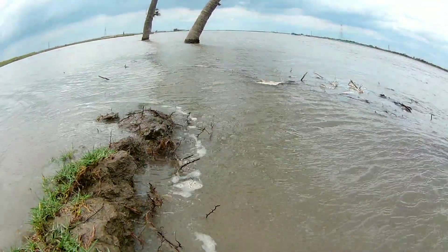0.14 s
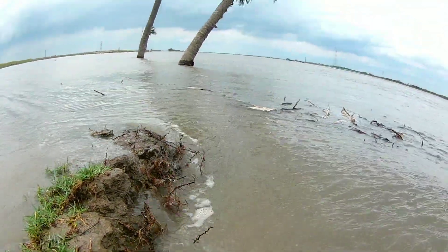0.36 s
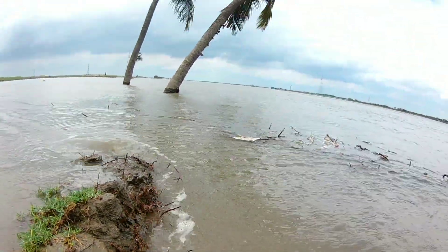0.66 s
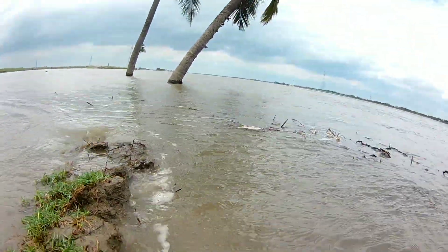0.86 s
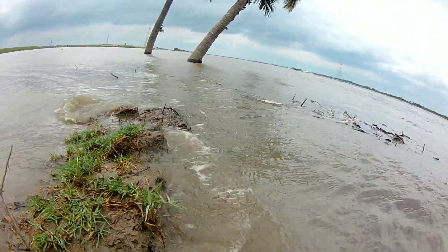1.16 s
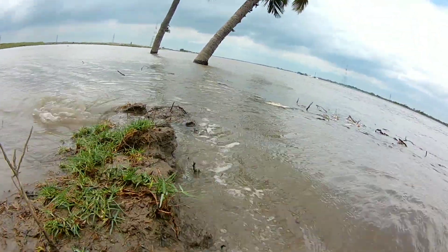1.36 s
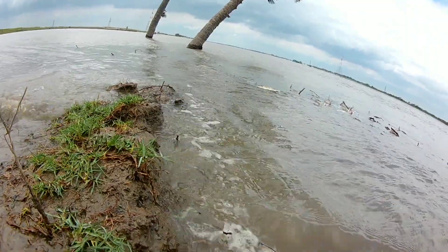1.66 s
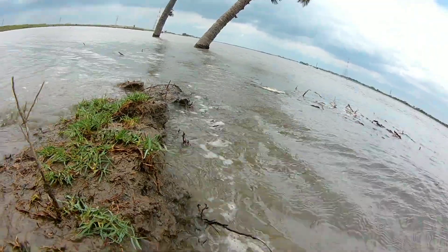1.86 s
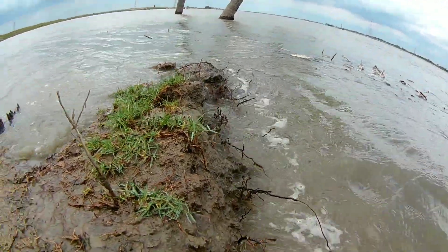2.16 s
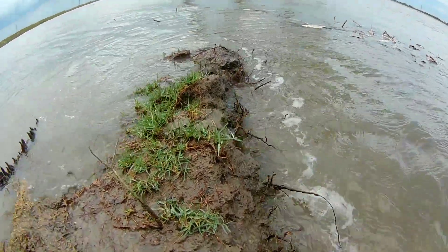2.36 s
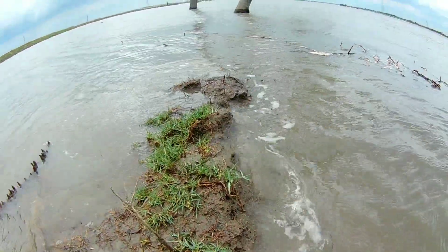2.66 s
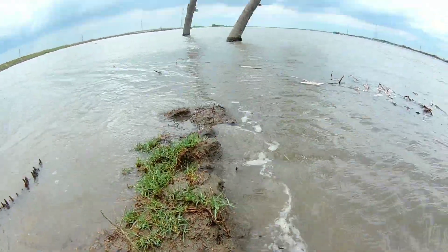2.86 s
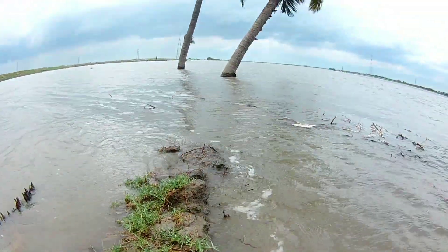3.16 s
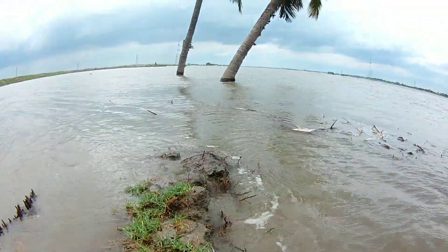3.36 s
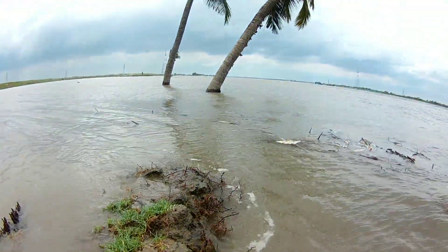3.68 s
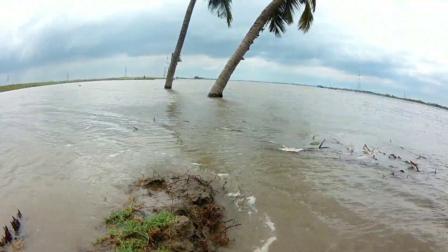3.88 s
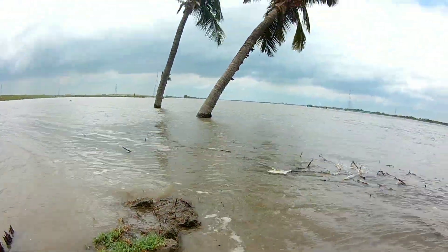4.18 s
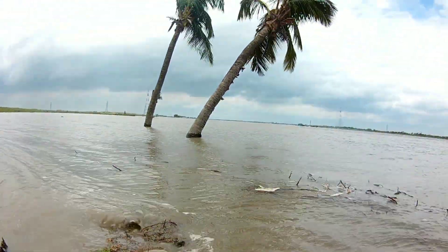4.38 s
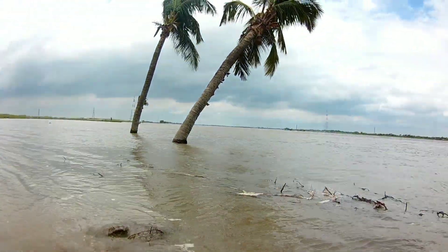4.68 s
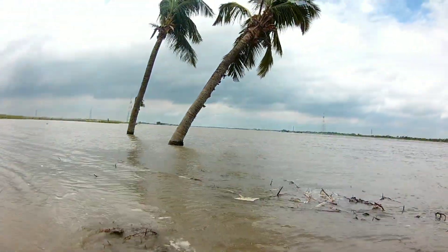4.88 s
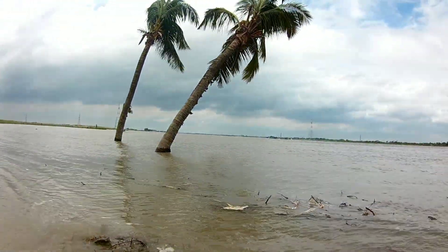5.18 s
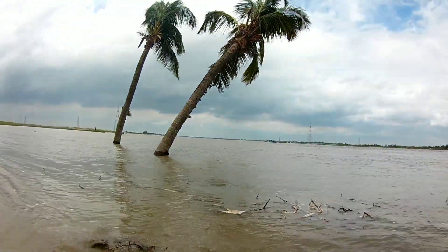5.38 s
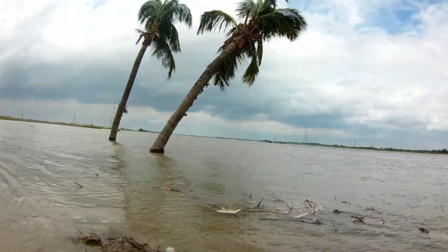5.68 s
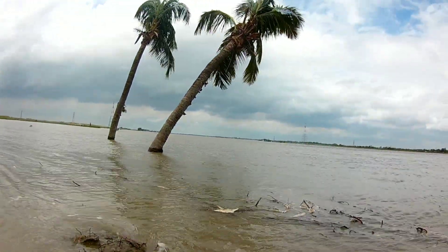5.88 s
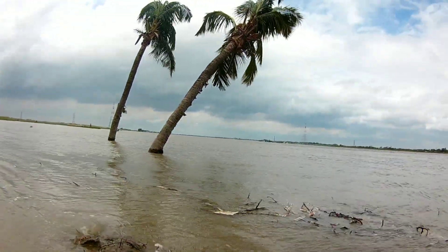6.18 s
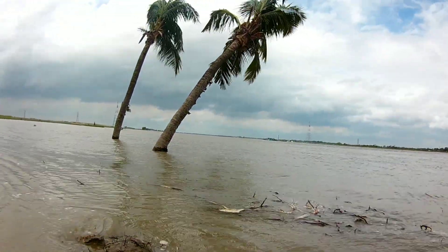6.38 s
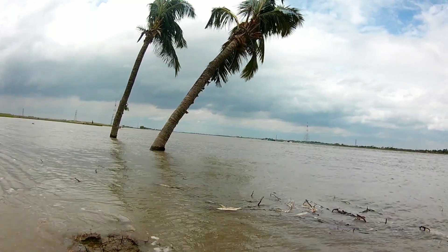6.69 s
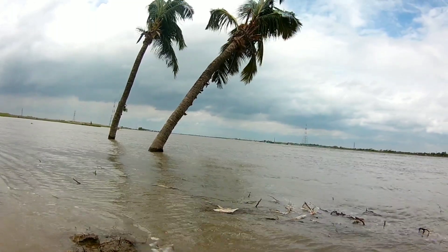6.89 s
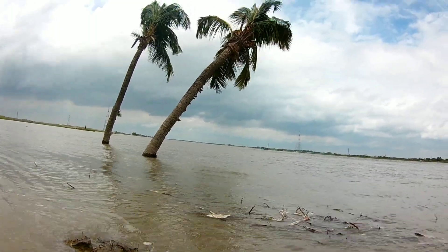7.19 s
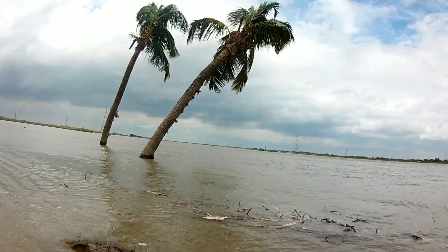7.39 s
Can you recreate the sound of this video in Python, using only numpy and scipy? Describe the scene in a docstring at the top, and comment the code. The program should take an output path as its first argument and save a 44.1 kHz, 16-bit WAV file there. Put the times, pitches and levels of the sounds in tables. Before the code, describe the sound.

A close microphone beside shallow floodwater in the wind. Deep buffeting and thumps open the scene, then fade to light rumble. Under everything lies a quiet wash of open-water ripples and faint hiss. Laps at the bank bring bursts of tiny bubbles, rising plops and crisp splashes, first lightly, then in a dense cluster, then sparsely, ending with one loud double slap and gurgle before calm.

```python
"""Floodwater lapping at a mud bank in the wind

Wind rumbles on a close microphone throughout: filtered noise, with a few hard gusts and thumps early on.
Far ripples make a noise wash, while crowds of tiny bubbles and drops follow the laps at the bank.
Wavelets slap the mud with pops and noisy cracks; larger bubbles are decaying tones that climb in pitch.
A faint hiss lies under it all, and the highest treble is cut off."""
import sys
import numpy as np
from scipy import signal
from scipy.fft import rfft, irfft, next_fast_len
from scipy.io import wavfile
from scipy.ndimage import uniform_filter1d, map_coordinates

SR = 44100
rng = np.random.default_rng(int(sys.argv[2]) if len(sys.argv) > 2 else 0)


def to_wav(sig):
    """Store sig (one row per channel, or 1-D mono) as 16-bit WAV at the path in sys.argv[1].

    Samples outside -1..1 are clipped; the rate is SR.
    """
    pcm = np.clip(np.atleast_2d(sig), -1, 1) * 32767
    pcm = np.round(pcm).astype(np.int16)
    wavfile.write(sys.argv[1], SR, pcm.T)  # frames by channels


N = 332514  # length in samples

# tone colour of the sharp cracks of slaps and drops: pitch_hz [Hz], level_db [dB, shape only]
CRACK_COLOUR = [(300, -4), (900, 1.5), (2100, 9), (3100, -7.5), (4100, 3.5), (5200, -7.5), (6600, -17),
                (7800, -29), (9500, -32), (15000, -30)]
BUBBLE_RISE_PER_S = 12  # share of its starting pitch that a bubble climbs in a second


def amp(db):
    """Turn decibels into a gain."""
    return 10 ** (np.asarray(db) / 20)


def unit(x):
    """Scale x to an rms of 1."""
    return x / np.sqrt(np.mean(x ** 2) + 1e-20)


def along(points, hz):
    """Read a (Hz, dB) curve at the given frequencies, on a log frequency axis."""
    point_hz, point_db = np.transpose(points)
    return np.interp(np.log(hz + 1), np.log(point_hz + 1), point_db)


def curves(rows):
    """Draw straight lines between the rows: one value per sample for each column after the time."""
    start_s, *columns = np.transpose(rows)
    return [np.interp(np.arange(N) / SR, start_s, column) for column in columns]


def wobble(rate):
    """A smooth random curve through `rate` random points a second."""
    points = rng.standard_normal(int(N * rate / SR) + 4)
    return map_coordinates(points, [np.arange(N) * rate / SR])


def filtered(x, response):
    """Multiply the spectrum of x by a response, a function of frequency in Hz."""
    size = next_fast_len(N + SR // 2)  # spare room so that tails do not wrap to the start
    spectrum = rfft(x, size)
    return irfft(spectrum * response(np.fft.rfftfreq(size, 1 / SR)), size)[:N]


def noise(colour, patchy_db):
    """Coloured noise of rms 1, with random louder and softer patches in time and pitch."""
    grid = signal.stft(rng.standard_normal(N), nperseg=512)[2]
    patches = uniform_filter1d(rng.standard_normal(grid.shape), size=5, axis=0)
    patches = uniform_filter1d(patches, size=5, axis=1)
    patchy = signal.istft(grid * amp(patchy_db * unit(patches)), nperseg=512)[1][:N]
    return unit(filtered(patchy, lambda hz: amp(along(colour, hz))))


def click(colour, size=512):
    """A click of peak 1 with the given colour, its energy packed as early as possible."""
    gain = amp(along(colour, np.fft.rfftfreq(size, 1 / SR)))
    cepstrum = irfft(np.log(gain))
    # folding the second half onto the first removes any sound ahead of the click
    cepstrum[1:size // 2] *= 2
    cepstrum[size // 2 + 1:] = 0
    impulse = irfft(np.exp(rfft(cepstrum)))
    return impulse / np.abs(impulse).max()


def add(track, start_s, sound):
    """Mix a sound into the track at a time in seconds."""
    part = track[max(round(start_s * SR), 0):][:len(sound)]
    part += sound[:len(part)]


def ring(hz, decay_ms, rise, soft):
    """A bubble's tone: its envelope swells to 1 and dies away while the pitch climbs by `rise` a second."""
    life = decay_ms / 1000
    t = np.arange(int(6 * life * SR) + 8) / SR
    swell = np.exp(-t / life) * (1 - np.exp(-t / (soft * life)))
    phase = 2 * np.pi * hz * (t + rise * t * t / 2)
    return swell / swell.max() * np.sin(phase)


def wind():
    """Moving air shakes the microphone: steady rumble, fluttering gusts, and pressure bumps of eddies."""
    # tone colour of the steady wind, then of the gusts: pitch_hz [Hz], level_db [dB, shape only]
    rumble_colour = [(15, -22.5), (28, -4), (39, -5.5), (52, 2), (66, -5.5), (90, -2), (112, -7.5),
                     (130, -4), (160, -11.5), (198, -8.5), (235, -17), (330, -19), (600, -39), (1500, -74)]
    gust_colour = [(12, -12.5), (28, 4), (70, -1), (140, -5.5), (220, -12), (400, -20), (800, -36.5),
                   (2000, -59), (5000, -102)]
    # gusts: crest_s [s], level_db [dB rms at the crest, before flutter and overlap], rise_s [s]
    gust_rows = [(.006, -17.5, 0.0061), (0.207, -16.5, 0.028), (0.498, -17, 0.0075), (0.561, -19.5, 0.016),
                 (.648, -23.5, 0.041), (1.209, -18, 0.026), (2.19, -30.5, 0.017), (2.58, -27, 0.073),
                 (4.455, -32.5, 0.047), (5.08, -35, 0.017), (5.927, -30, 0.012), (7.385, -29.5, 0.016)]
    # eddies that thump the microphone: centre_s [s], level_db [dB peak before the leak],
    # half_ms [ms from the peak to half of it]
    eddy_rows = [(0.013, -11.5, 2), (0.209, -2.5, 1.6), (.500, -13, 0.75), (0.552, -10, 2.2),
                 (0.629, -10.5, 0.57), (0.66, -10.5, 0.72), (1.211, -9.5, 2.2)]
    breeze_db, sway_db, sway_per_s = -36, -0.5, 5
    gust_tail = 1.44  # a gust dies this many times more slowly than it builds
    t = np.arange(N) / SR
    rumble = amp(breeze_db + sway_db * wobble(sway_per_s)) * noise(rumble_colour, patchy_db=0)

    power = 0
    for crest_s, level_db, rise_s in gust_rows:
        x = (t - crest_s) / rise_s
        away = np.maximum(-x, x / gust_tail)
        swell = 1 / np.cosh(np.minimum(away, 20))  # the limit avoids overflow
        power = power + (amp(level_db) * swell) ** 2
    flutter = amp(2.5 * wobble(90))
    gusts = np.sqrt(power) * unit(flutter * noise(gust_colour, patchy_db=0.5))

    bumps = np.zeros(N)
    for centre_s, level_db, half_ms in eddy_rows:
        bumps += amp(level_db) / (1 + ((t - centre_s) * 1000 / half_ms) ** 2)
    # the microphone leaks slow pressure, below about 25 Hz
    bumps = filtered(bumps, lambda hz: 1j * hz / (25 + 1j * hz))
    fade_in = np.minimum(t / 0.0017, 1)
    return (rumble + gusts + bumps) * fade_in


def open_water():
    """Countless far ripples merge into a wash of noise with a thin fizz on top."""
    # open water: start_s [s], wash_db, fizz_db [dB rms before the trims below]
    water_rows = [(0.0, -46, -64), (2.12, -48, -66), (2.5, -47, -67), (3.74, -49, -65.5),
                  (5.86, -48, -63.5), (6.24, -47.5, -58.5), (6.49, -47.5, -62), (7.54, -47, -62.5)]
    # tone colour of the wash, then of the fizz: pitch_hz [Hz], level_db [dB, shape only]
    wash_colour = [(200, -6.5), (450, 0.5), (680, 0), (1150, -4), (1500, -8.5), (1850, -9), (2400, -16.5),
                   (3100, -23), (4500, -52), (8000, -48)]
    fizz_colour = [(2000, -10.5), (3200, -11), (3700, 1.5), (4100, 3), (4600, -2), (5500, -9.5),
                   (6800, -13.5), (7800, -25.5), (9400, -16.5), (12000, -36)]
    wash_db, fizz_db = curves(water_rows)
    sway_db = 0.85 * wobble(22)
    wash = amp(wash_db - 1.0 + sway_db) * noise(wash_colour, patchy_db=1.5)
    return wash + amp(fizz_db - 2.0) * noise(fizz_colour, patchy_db=2.0)


def churn():
    """How hard water churns at the bank, as a gain: each lap swells, holds and drains away."""
    # wavelets that wash up the bank: full_s [s, when the hold begins],
    # level_db [dB gain, before overlap], hold_s [s]
    lap_rows = [(0.854, -55.5, 0.12), (2.297, -46.5, .3), (2.804, -48.5, 0.76), (4.27, -49.5, .12),
                (6.103, -45.5, 0.26)]
    attack_s, release_s = 0.19, 0.082  # time constants of the swell and the draining
    calm_db = -57  # churn between laps
    t = np.arange(N) / SR
    power = amp(calm_db) ** 2
    for full_s, level_db, hold_s in lap_rows:
        before = np.maximum(full_s - t, 0) / attack_s
        after = np.maximum(t - full_s - hold_s, 0) / release_s
        power = power + (amp(level_db) * np.exp(-before - after)) ** 2
    return np.sqrt(power)


def gurgle(count=2400):
    """Many small bubbles ring, denser and louder with the churn; smaller, higher ones tend to die sooner."""
    middle_hz, spread = 1170, 0.782  # middle pitch, and the range either way as a natural log
    out, stir = np.zeros(N), churn()
    # more churn makes a moment more likely to be drawn
    times = np.interp(rng.random(count), np.cumsum(stir) / stir.sum(), np.arange(N) / SR)
    for start_s, (pitch, life, size, climb) in zip(times, rng.standard_normal((count, 4))):
        hz = middle_hz * np.exp(spread * np.tanh(pitch / 2))
        decay_ms = 1.53 * np.exp(0.72 * min(life, 2)) * np.sqrt(1300 / hz)
        rise = BUBBLE_RISE_PER_S + 6 * climb
        add(out, start_s, amp(5.9 * min(size, 1.7)) * ring(hz, decay_ms, rise, soft=0.22))
    # crowding already gives half of the swell, so the gain gives the other half
    return amp(-3.0) * np.sqrt(stir * stir.mean()) * unit(out)


def droplets(count=900):
    """Spray and bursting foam tick, louder with the churn: a sharp impact and a very short ring."""
    rings, impacts = np.zeros(N), np.zeros(N)
    impact = click(CRACK_COLOUR)
    for when, (pitch, size) in zip(rng.random(count), rng.standard_normal((count, 2))):
        start_s = when * N / SR
        gain = amp(8.4 * min(size, 2))
        hz = 4300 * np.exp(.5 * np.tanh(pitch / 2))
        add(rings, start_s, gain * ring(hz, 0.84, 0, soft=0.34))
        add(impacts, start_s, gain * impact)
    return churn() * (amp(-23) * unit(rings) + amp(-19) * unit(impacts))


def slaps():
    """A wavelet shuts a pocket of air against the mud: a short pop, and a crack that trails off in spray."""
    # slaps: start_s [s], pitch_hz [Hz, air pocket], level_db [dB, pocket before softening],
    # crack_db [dB, spray before the trim and colouring below]
    slap_rows = [(0.315, 1820, -29, -42), (.439, 1230, -24.5, -38), (0.632, 1070, -22.5, -50),
                 (0.848, 1720, -31, -42), (2.136, 1380, -30, -35.5), (2.222, 2000, -43, -32.5),
                 (2.258, 1310, -30, -30.5), (2.268, 5060, -34.5, -31), (2.329, 1470, -44, -31.5),
                 (2.386, 1980, -35, -22.5), (2.423, 1860, -33, -41), (2.552, 1500, -45, -41),
                 (2.871, 1560, -29, -46), (3.236, 4900, -60, -36), (3.476, 1060, -18.5, -31),
                 (3.488, 5400, -56, -31), (4.325, 3970, -51, -40), (4.537, 1720, -29, -35),
                 (5.893, 3830, -40, -44), (6.098, 1120, -27, -32), (6.183, 810, -16, -27),
                 (6.196, 4240, -36, -29), (6.2381, 2340, -26, -46), (6.2387, 3860, -19.5, -22.5),
                 (6.246, 980, -13, -38)]
    pocket_decay_ms = 0.75  # an air pocket against soft mud hardly rings
    pops, cracks = np.zeros(N), np.zeros(N)
    t = np.arange(SR // 20) / SR
    for start_s, pitch_hz, level_db, crack_db in slap_rows:
        add(pops, start_s, amp(level_db) * ring(pitch_hz, pocket_decay_ms, 0, soft=0.5))
        fade = 0.27 * np.exp(-t / 0.0012) + 0.05 * np.exp(-t / 0.0099)
        spray = rng.standard_normal(len(t)) * fade
        spray[0] = 1  # the first hit
        add(cracks, start_s, amp(crack_db - 3.5) * spray)
    pops = filtered(pops, lambda hz: 1 / (1 + (hz / 7500) ** 6))  # soft mud rounds off the onset
    return pops + signal.fftconvolve(cracks, click(CRACK_COLOUR))[:N]


def plops():
    """Single large bubbles ring and climb in pitch as they near the surface."""
    # large bubbles: start_s [s], pitch_hz [Hz at the start], level_db [dB peak before the trim below
    # and the torn surface], decay_ms [ms]
    bubble_rows = [(.812, 2500, -40.5, 2.5), (.846, 433, -31, 10), (1.735, 2980, -43, 1.1),
                   (1.994, 710, -31, 3.2), (2.104, 780, -35, 6), (2.287, 1380, -34, 1.8),
                   (2.326, 830, -27.5, 3.4), (2.336, 1880, -28, 1.3), (2.379, 1110, -23, 1.5),
                   (2.398, 970, -28, 1.8), (2.411, 1616, -32, 4.2), (2.499, 945, -31, 5.8),
                   (2.523, 1423, -30, 6.7), (2.545, 609, -33, 7.8), (2.66, 1036, -29, 3.3),
                   (2.785, 1380, -31.5, 5), (2.869, 647, -35, 9.1), (3.069, 1276, -35, 6.8),
                   (3.131, 1399, -31.5, 1.4), (3.168, 2230, -39, 2.6), (3.308, 1280, -34.5, 4.25),
                   (3.397, 1830, -32.5, 4.4), (3.423, 1720, -33.5, 2), (3.521, 676, -29.5, 4.4),
                   (3.532, 1195, -32, 3.4), (3.875, 1365, -36.5, 9.6), (4.243, 1670, -37.5, 2.5),
                   (4.279, 875, -36.5, 4.55), (4.526, 943, -28.5, 3.8), (4.538, 852, -22.5, 3.2),
                   (5.375, 1253, -32.5, 6.5), (5.377, 2760, -44, 5.1), (6.094, 840, -31.5, 4.9),
                   (6.158, 1253, -33, 2), (6.171, 1240, -30, 7.9), (6.279, 830, -32.5, 8),
                   (6.438, 1140, -33.5, 6)]
    out = np.zeros(N)
    for start_s, pitch_hz, level_db, decay_ms in bubble_rows:
        add(out, start_s, amp(level_db - .5) * ring(pitch_hz, decay_ms, BUBBLE_RISE_PER_S, soft=0.2))
    return out


def glugs(count=6):
    """A hollow filling with water sheds a quick run of bubbles, which get smaller and so tend to go higher."""
    # filling hollows in the mud: start_s [s], length_s [s], first_hz [Hz], last_hz [Hz, where the run heads],
    # level_db [dB peak before trim, scatter and the torn surface]
    glug_rows = [(.895, .04, 870, 1050, -44), (0.969, .025, 993, 1450, -46), (2.544, .04, 1070, 1160, -45),
                 (2.669, .05, 1665, 2838, -48.5), (2.823, .06, 1390, 1710, -42.5),
                 (2.877, 0.032, 680, 929, -42), (2.969, .045, 827, 1050, -36),
                 (3.084, .08, 1030, 1496, -41), (3.317, .025, 1597, 1960, -44),
                 (3.512, .07, 950, 1350, -45), (3.832, .04, 974, 1190, -41.5),
                 (4.559, .03, 1675, 2042, -47), (6.275, .07, 723, 1155, -39), (6.37, .09, 492, 1395, -36)]
    decay_ms, scatter_db, detune_spread = 6.1, 1.7, 0.029  # detune is a natural log
    rise = 0.755 * BUBBLE_RISE_PER_S
    out = np.zeros(N)
    for start_s, length_s, first_hz, last_hz, level_db in glug_rows:
        for k, (late, detune, size) in enumerate(rng.standard_normal((count, 3))):
            done = (k + .25 * late) / count  # share of the run that has passed
            hz = first_hz * (last_hz / first_hz) ** done * np.exp(detune_spread * detune)
            gain = amp(level_db - 2.5 + scatter_db * size)
            add(out, start_s + done * length_s, gain * ring(hz, decay_ms, rise, soft=0.24))
    return out


def torn_surface(x):
    """The torn surface above the larger bubbles roughens each ring and scatters it briefly."""
    rough, scatter_db, scatter_s = 0.28, -8.5, 0.0093  # depth of roughness; scatter level and decay time
    x = x * (1 + rough * wobble(1200))
    t = np.arange(SR // 25) / SR
    scatter = rng.standard_normal(len(t)) * np.exp(-t / scatter_s)
    scatter = scatter / np.linalg.norm(scatter)
    return x + amp(scatter_db) * signal.fftconvolve(x * wobble(700), scatter)[:N]


def scene():
    """Wind and water add up at one microphone."""
    far = wind() + open_water()
    bank = gurgle() + droplets() + slaps()
    large_bubbles = torn_surface(plops() + glugs())
    return (far + bank + large_bubbles)[None]


def record(dry):
    """The recorder adds its own nearly even hiss and keeps nothing above its band limit."""
    # tone colour of the hiss: pitch_hz [Hz], level_db [dB, shape only]
    hiss_colour = [(1000, 0), (7000, 1.2), (8000, -2), (9400, 0.0048), (11500, -1), (15500, 2)]
    top_hz = 15750
    hiss = unit(filtered(rng.standard_normal(N), lambda hz: amp(along(hiss_colour, hz))))
    return filtered(dry[0] + amp(-72.0) * hiss, lambda hz: hz < top_hz)[None]


dry = scene()
out = record(dry)
to_wav(out)
```